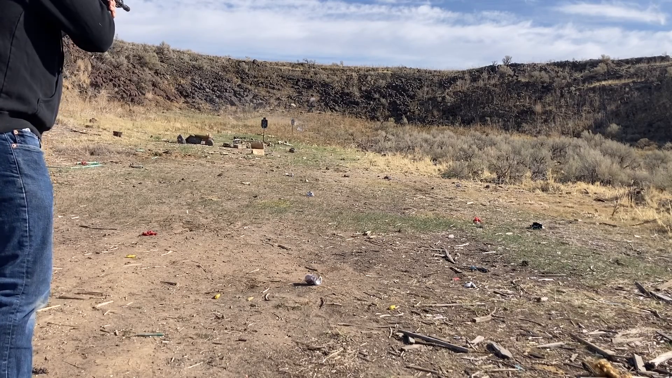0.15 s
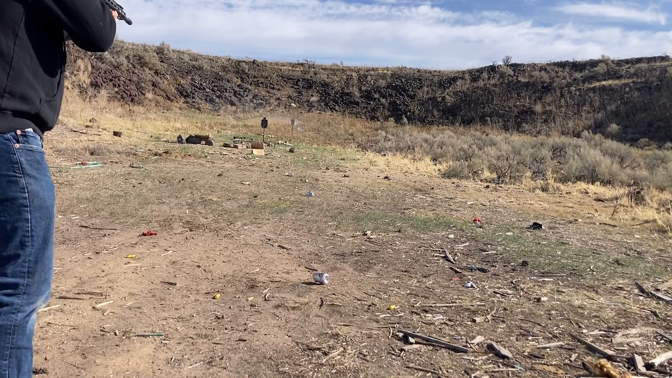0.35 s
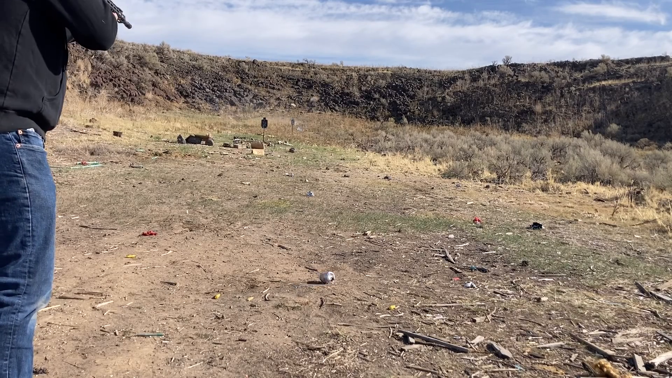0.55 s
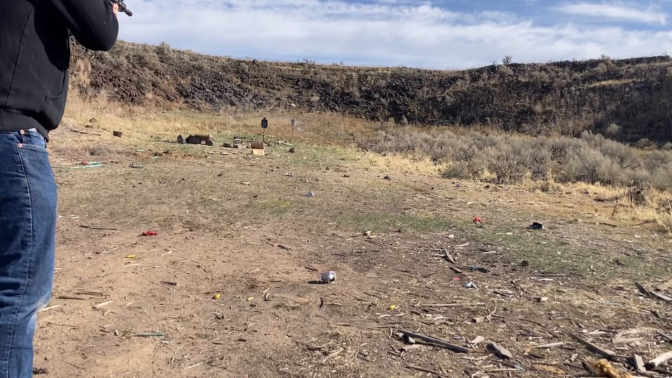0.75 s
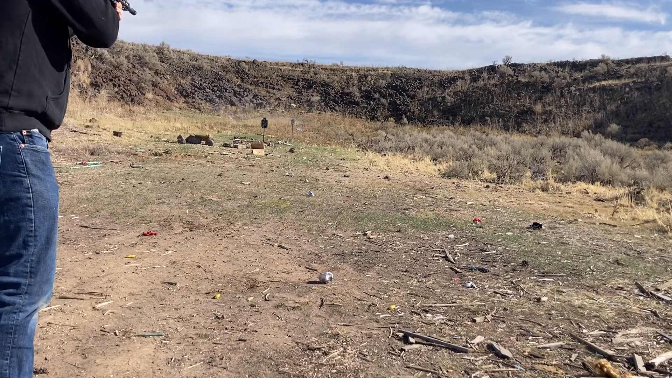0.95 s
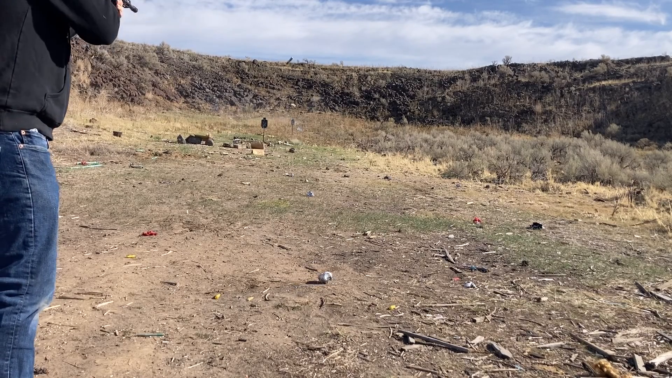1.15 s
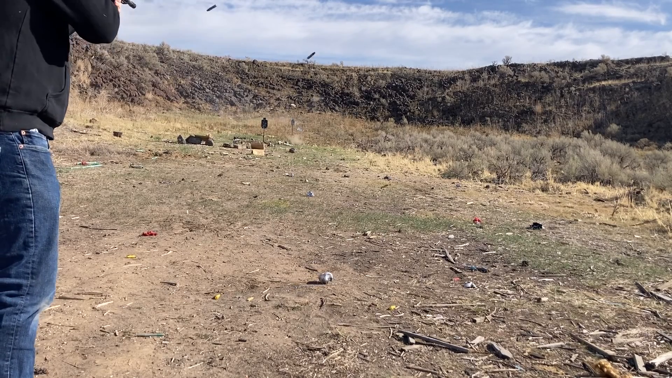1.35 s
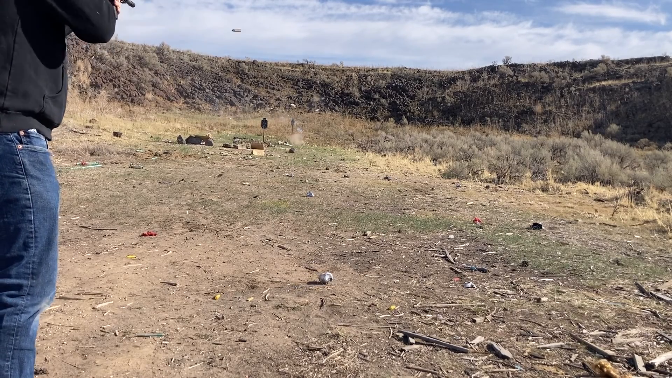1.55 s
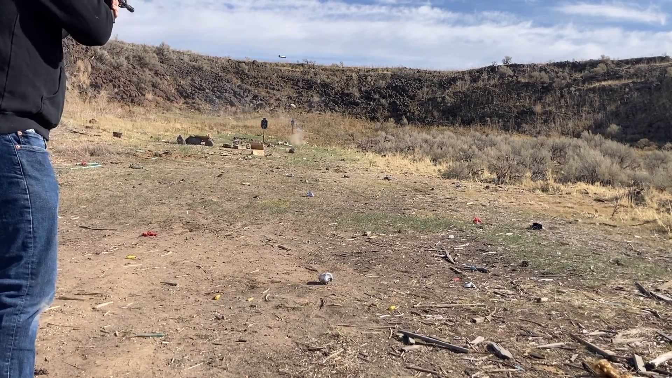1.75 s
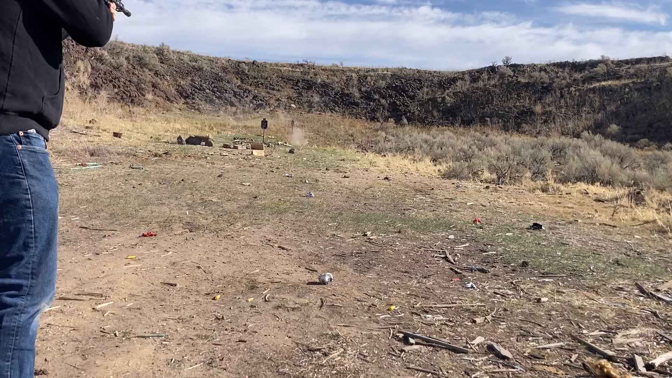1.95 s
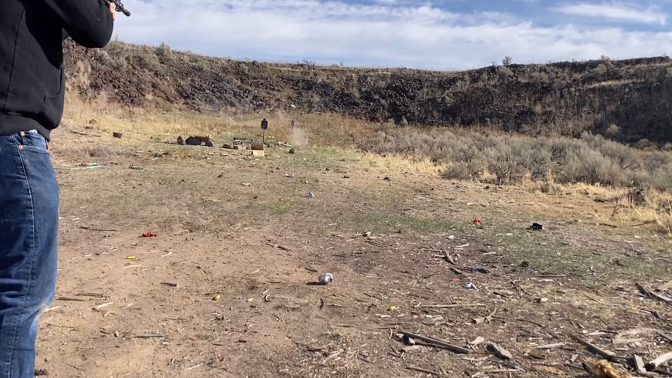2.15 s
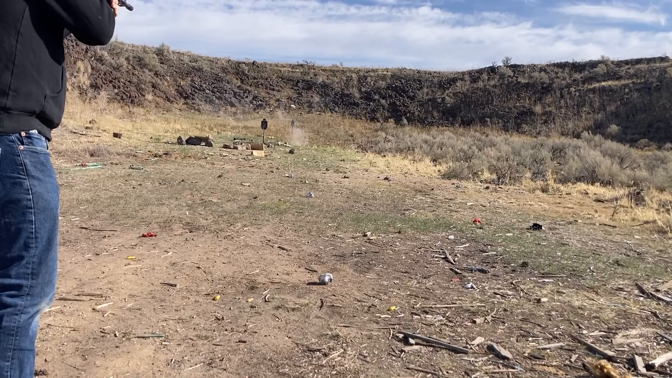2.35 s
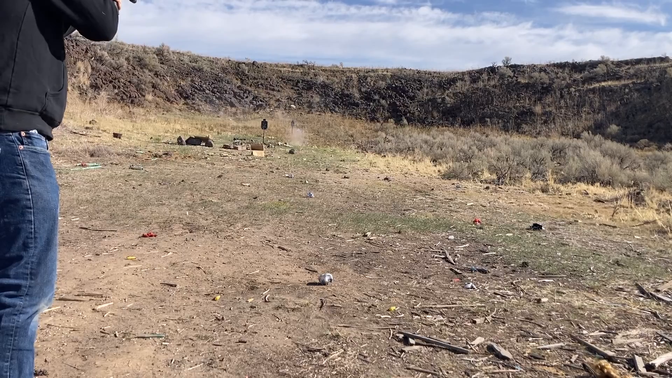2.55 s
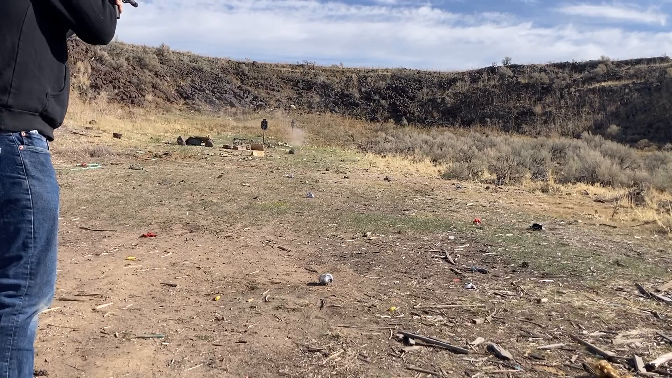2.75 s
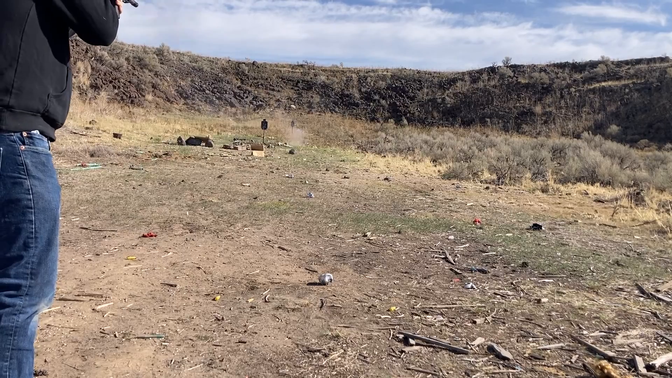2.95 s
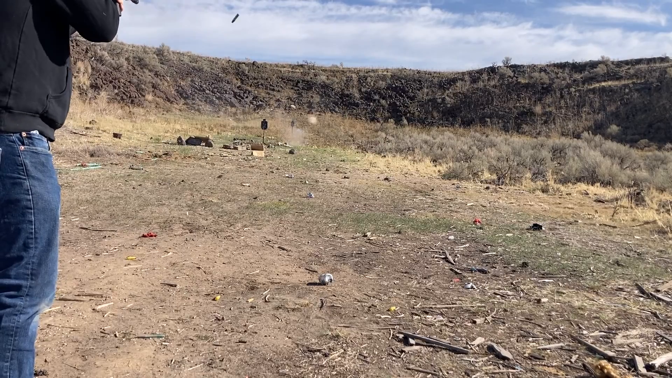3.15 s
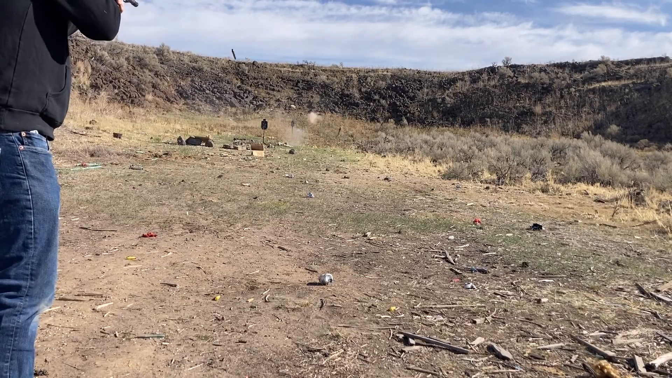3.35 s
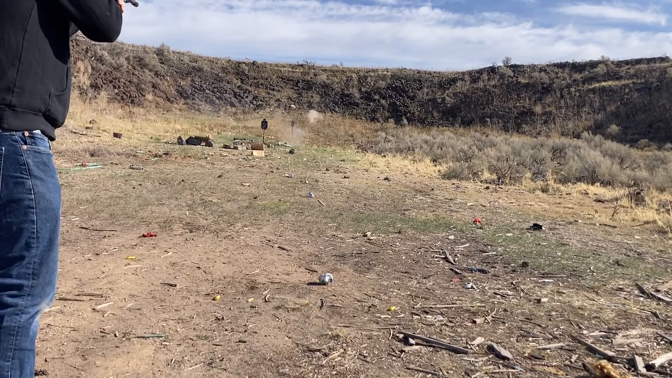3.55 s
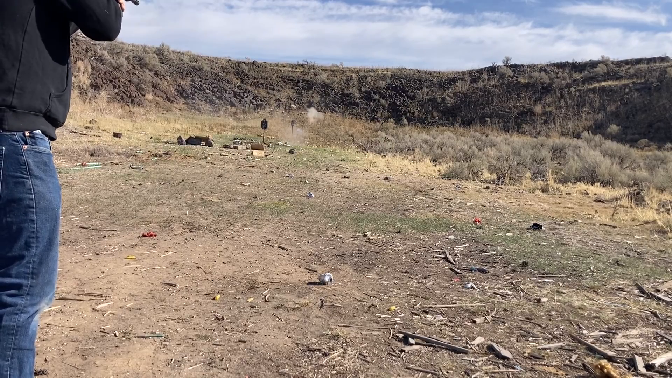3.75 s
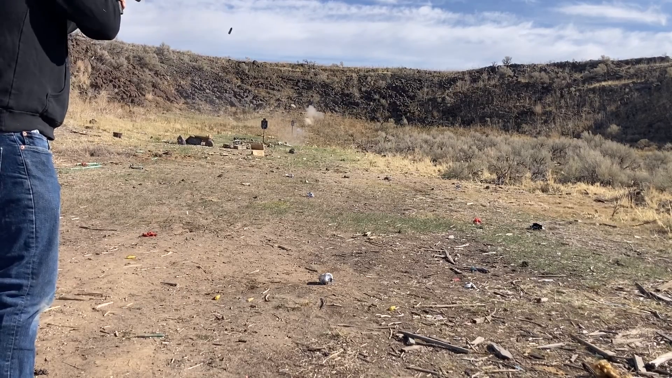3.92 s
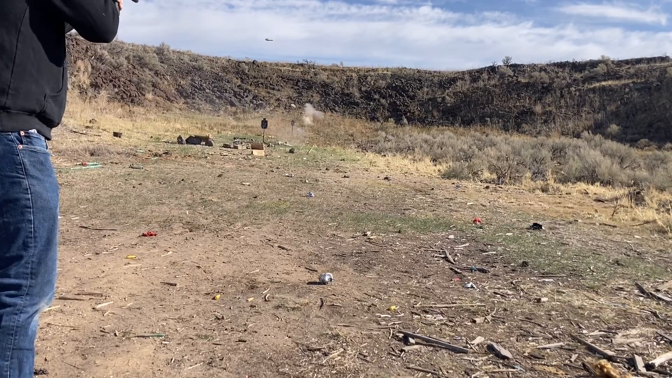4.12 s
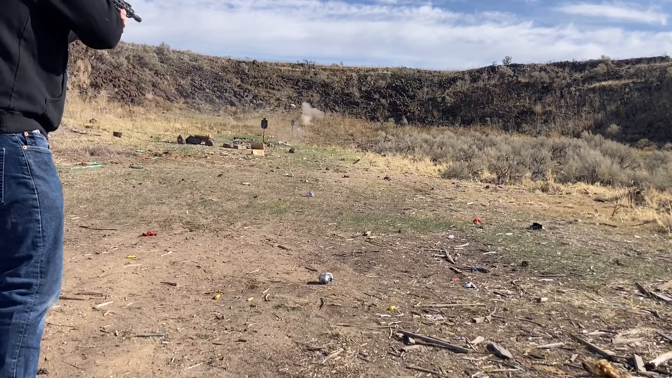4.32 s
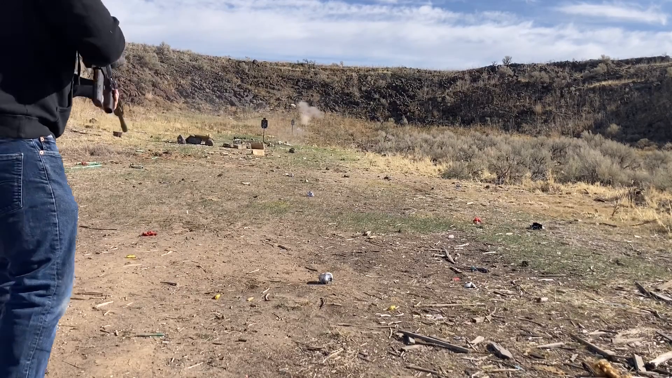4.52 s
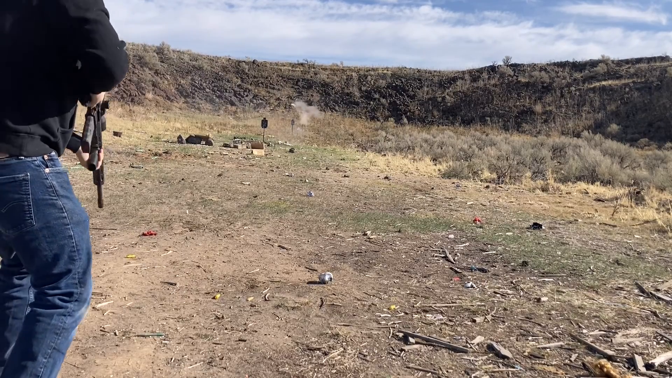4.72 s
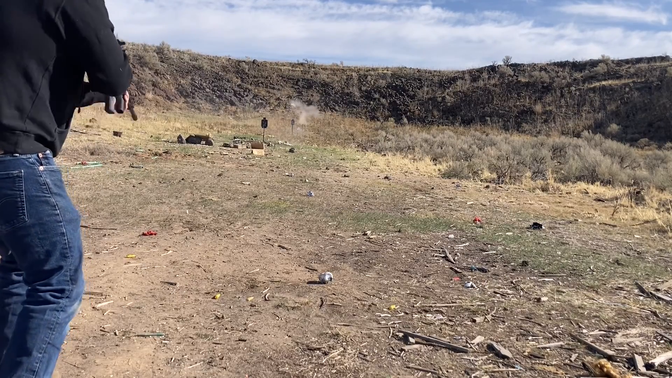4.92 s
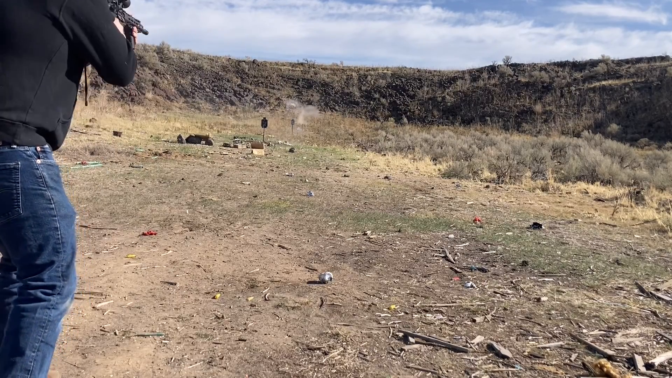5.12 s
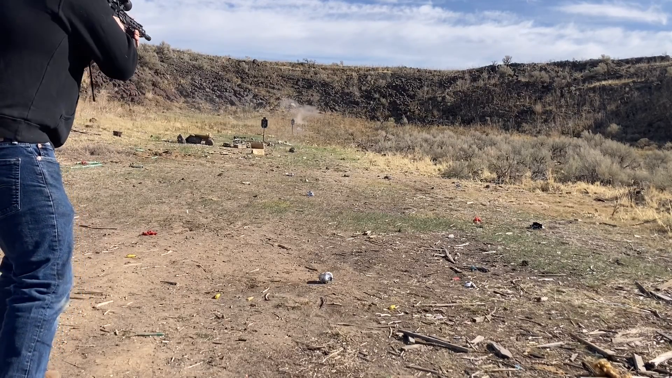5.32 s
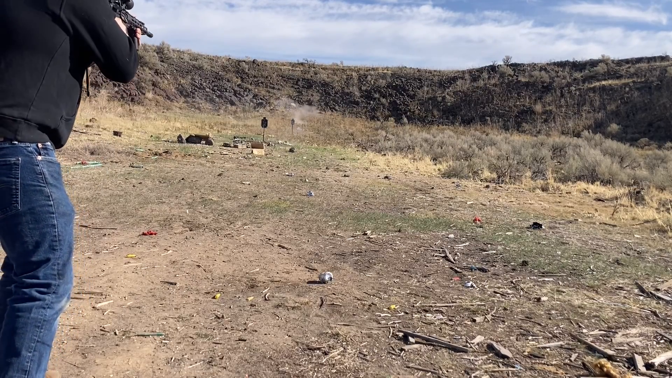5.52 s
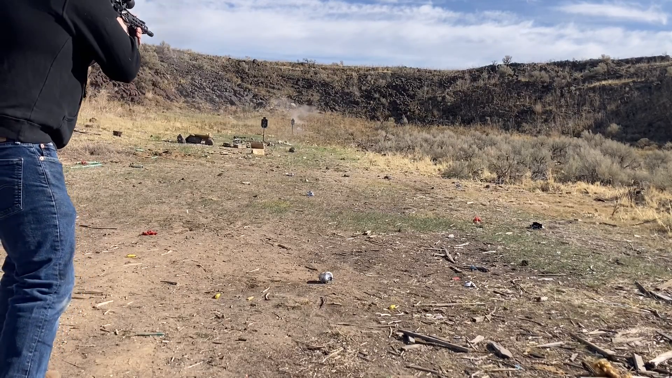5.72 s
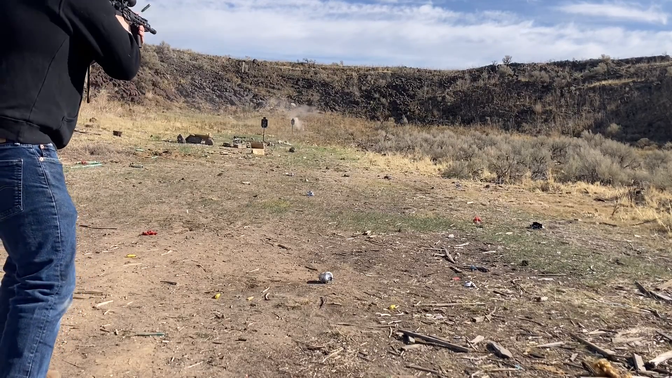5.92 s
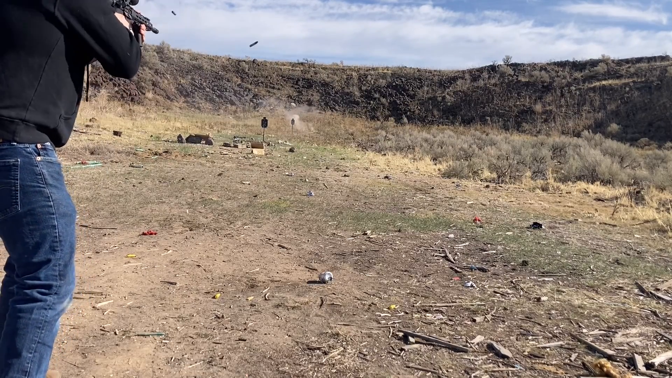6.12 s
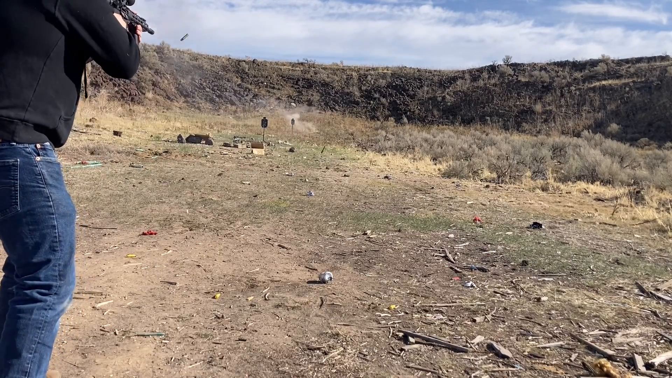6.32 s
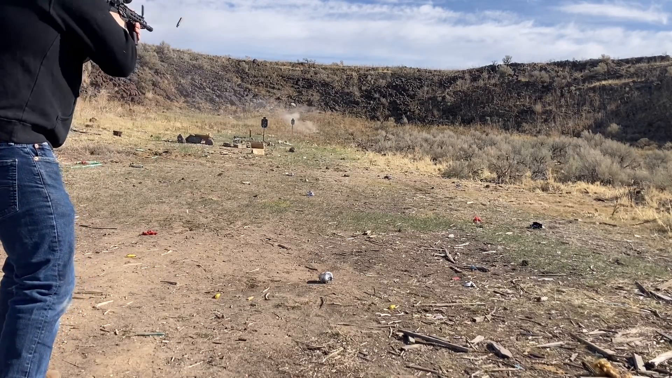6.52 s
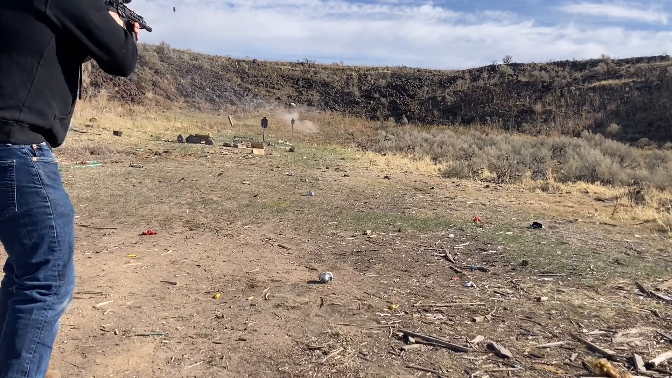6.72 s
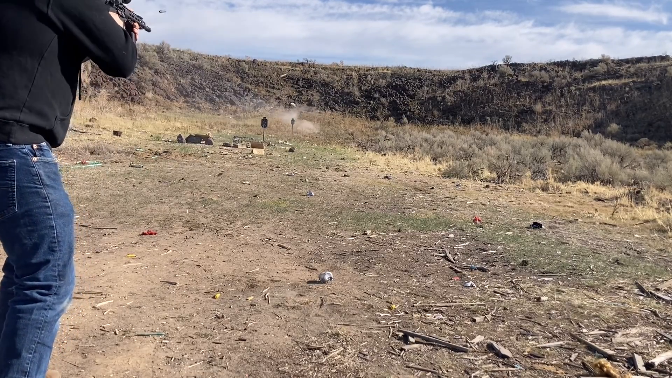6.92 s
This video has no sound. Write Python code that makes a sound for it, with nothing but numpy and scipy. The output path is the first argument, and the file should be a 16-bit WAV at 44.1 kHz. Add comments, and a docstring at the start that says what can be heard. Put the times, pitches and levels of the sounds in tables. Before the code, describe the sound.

Rapid rifle fire heard close up in an open dirt range backed by an earth bank. A tiny brass tink precedes a burst of five sharp blasts; more cases tink, two double shots follow, then brighter tinks and a quiet lull with barely any wind. Eight steady shots finish it. The nearby microphone clips on every blast, and rough, falling echoes fill the spaces and fade into distant hills.

```python
"""A breeze rumbles and bumps on a stereo microphone while an earlier shot dies away in far hills.
A brass case tinks, then a semi-automatic rifle a few steps away fires five quick shots on a dirt range.
More cases tink on stones before two pairs of shots and again after them; the breeze lulls, then eight shots end it.
Blasts are pressure fronts, shaped noise and damped modes that overload the microphone.
Their echoes are filtered noise, delayed and spread by ground, ledges, bank and hills, plus a falling scrub note."""
import sys
import numpy as np
from scipy import signal
from scipy.fft import rfft, irfft, next_fast_len
from scipy.io import wavfile
from scipy.ndimage import uniform_filter1d, map_coordinates

SR = 44100
rng = np.random.default_rng(int(sys.argv[2]) if len(sys.argv) > 2 else 0)


def waveform_to_disk(signal):
    """Save audio, clipped to [-1, 1], as 16-bit WAV at the path in sys.argv[1]."""
    frames = np.transpose(np.atleast_2d(signal))
    scaled = np.clip(frames, -1, 1) * 32767
    samples = np.round(scaled).astype(np.int16)
    wavfile.write(sys.argv[1], SR, samples)


N = 311787

# All spectra are relative, since the noise is scaled to rms 1 after filtering.
# Breeze spectrum. Each row: frequency in Hz, relative density in dB.
RUMBLE_SPECTRUM = [(20, -11), (35, 3), (60, 9.5), (120, 0.5), (200, -15), (350, -32.5), (800, -32),
                   (3000, -46), (16000, -59)]
# Soft low bumps in the breeze. Each row: start in seconds, level in dB.
BUMPS = [(0.492, -47), (0.729, -50), (2.609, -48), (2.75, -53), (2.815, -56), (4.975, -59)]
# Bump spectrum. Each row: frequency in Hz, relative density in dB.
BUMP_SPECTRUM = [(25, 22), (60, 10), (150, -2.5), (280, -17), (500, -47), (1200, -41), (8000, -63.5)]
BREEZE_DB = -61.5
LULL_DB, LULL_S, LULL_WIDTH_S = -13, 5.3, .5  # one lull in the breeze

# Brass cases landing. Each row: start in seconds, click in dB, ring in dB, extra dB on the lowest mode.
CASES = [(0.08, -66, -77, 0), (1.99, -50, -55, 4), (2.063, -60, -68, 6), (2.139, -67, -74, 0),
         (2.35, -80, -58, 6), (4.113, -39, -71, 0), (4.535, -43, -36, -18), (4.686, -64, -88, 0)]
# Modes of a brass case. Each row: nominal frequency in Hz, relative level in dB, 60 dB decay time in seconds.
BRASS_MODES = [(10790, -15, .15), (14935, -8, .18), (15030, 0, .08), (15700, -16, .05)]
# Click spectrum. Each row: frequency in Hz, relative density in dB.
CLICK_SPECTRUM = [(300, 8), (1500, -5), (4000, -3), (8000, -8), (13000, 1.5), (16000, -4.5)]

# Far slopes and the ridge behind them.
# Each row: delay in seconds, relative level in dB, rise, hold and 60 dB decay time in seconds.
HILL_FACES = [(.25, -67, .2, .6, 1.3), (.665, -58, 0.018, 0.038, 0.25)]
# Hill echo spectrum. Each row: frequency in Hz, relative density in dB.
HILLS_SPECTRUM = [(60, -6.5), (200, 12), (500, -0.5), (1200, -3), (2300, -1), (3500, -14.5), (6000, -28),
                  (12000, -46)]
# Earth bank: near side, middle and far side.
# Each row: delay in seconds, relative level in dB, rise, hold and 60 dB decay time in seconds.
BANK_FACES = [(.11, -27.5, 0.019, 0.046, .5), (.16, -35.5, .015, 0.012, .4), (.26, -33, 0.019, .17, .38)]
# Bank echo spectrum. Each row: frequency in Hz, relative density in dB.
BANK_SPECTRUM = [(25, -15), (60, -0.5), (130, 8.5), (260, 2), (450, -3.5), (800, -1), (1400, -7.5),
                 (2400, -4.5), (4500, -8.5), (8000, -11), (12000, -13), (15500, -29.5), (16500, -50)]
# Single rocks and ledges. Each row: delay after the shot in seconds, relative level in dB.
LEDGES = [(0.05, -28), (.135, -27.5), (0.169, -29.5), (.184, -25.5), (0.205, -35.5), (.33, -28),
          (0.377, -48), (.43, -38.5)]
# Ledge echo spectrum. Each row: frequency in Hz, relative density in dB.
SLAP_SPECTRUM = [(100, -19.5), (300, 11.5), (900, 14), (2500, -8), (5000, -14.5), (12000, -22.5),
                 (16000, -36.5)]
# The scrub's note sags, then drops, and swells while it drops.
SWOOP_FROM_HZ, SWOOP_SAG_HZ_PER_S, SWOOP_TO_HZ = 530, 920, 123.3
SWOOP_FALL_S, SWOOP_FALL_WIDTH_S = .155, 0.017
SWOOP_DB, SWOOP_RISE_S, SWOOP_HOLD_S, SWOOP_T60_S = -44, .025, 0.15, 0.2
SWELL_DB, SWELL_S, SWELL_WIDTH_S = 15, .15, 0.03
# Near-ground scatter spectrum. Each row: frequency in Hz, relative density in dB.
GROUND_SPECTRUM = [(30, -6.5), (100, -0.5), (220, 0.5), (470, 3.5), (850, 1), (1500, -4), (3000, -8),
                   (5000, -8.5), (8000, -9), (11500, -10.5), (15500, -17.5), (16500, -51)]
GROUND_DB, GROUND_RISE_S, GROUND_NEAR_S, GROUND_T60_S = -13.5, 0.0031, 0.014, 0.74

# Rifle shots. Each row: start in seconds, blast in dB, thump in dB, echo in dB.
SHOTS = [(0.8777, -4.5, -11.5, -1.5), (1.042, -2.5, -14, -1.5), (1.185, -3.5, -9, -5),
         (1.337, -4, -5, -3.5), (1.4778, -2.5, -11, -3), (2.95, -4.5, -8.5, -2.5), (3.1187, -5, -6.5, -4.5),
         (3.699, -4, -5.5, -2.5), (3.8533, -3, -18, -3.5), (5.717, -5, -4, -1), (5.874, -3, -41, -3.5),
         (6.022, -4, -4.5, -3.5), (6.1751, -4, -9, -2.5), (6.322, -4.5, -12, -3), (6.473, -4, -8, -3.5),
         (6.6296, -4, -15.5, -3.5), (6.7831, -4, -3.5, -5)]
EARLIER_SHOT_S = -0.595  # only its echo from the hills is still in the air
# Shock fronts, direct and off the ground. Each row: nominal delay after the shot in seconds, relative level in dB.
SHOCKS = [(.0027, -3.5), (.005, -3.5), (.0072, -5.5)]
# Muzzle gas spectrum. Each row: frequency in Hz, relative density in dB.
GAS_SPECTRUM = [(60, -18), (250, -0.5), (800, 13), (1500, 6), (2200, 5.5), (3200, -2.5), (5000, -1),
                (7000, 3.5), (11500, 3.5), (15500, -4), (16500, -24.5)]
# Modes of the hollow bark.
# Each row: nominal frequency in Hz, relative level in dB, 60 dB decay time in seconds.
BARK_MODES = [(218, 3, 0.052), (439, 4.5, 0.04), (722, 2, 0.039), (862, 1, .036), (1166, 1, .04),
              (1860, -5, 0.053), (2431, -11.5, 0.015), (2780, -8.5, 0.09), (4240, -17, 0.057)]
GAS_DB, GAS_RISE_S, GAS_HOLD_S, GAS_T60_S = -8, 0.0024, .007, .042
SHOCK_DB, BARK_DB = -16, -13.5
# the low push just behind the shock fronts; its pitch varies around PUNCH_HZ
PUNCH_DB, PUNCH_HZ, PUNCH_S, PUNCH_WIDTH_S = -14.5, 259, .008, 0.0043

# Diffuse sound at the two ports. Each row: frequency in Hz, left-right correlation from -1 to 1.
PORT_LIKENESS = [(100, .93), (280, 0.89), (600, -0.078), (1300, -0.11), (2200, 0.017), (4500, 0.2),
                 (6500, 0.65), (8500, 1)]
TOP_HZ = 16700  # upper band limit of the microphone


def amp(db):
    """Level to amplitude: 20 dB is a factor of ten."""
    return 10 ** (np.asarray(db) / 20)


def unit(x):
    """Normalisation of mean power: scale to rms 1."""
    return x / np.sqrt(np.mean(x ** 2) + 1e-20)


def clock(seconds):
    """Uniform sampling: sample times from zero."""
    return np.arange(int(seconds * SR)) / SR


def along(points, hz):
    """Logarithmic pitch scale: read (Hz, value) points on a log frequency axis."""
    f, v = np.transpose(points)
    return np.interp(np.log(hz + 1), np.log(f + 1), v)


def bell(t, centre, width):
    """Gaussian pulse: a smooth hump of height 1."""
    return np.exp(-((t - centre) / width) ** 2)


def envelope(t, rise, hold, t60):
    """Exponential decay: a soft attack, no decay until hold, then 60 dB lost per t60; silent before 0."""
    t = np.maximum(t, 0)
    attack = 1 - np.exp(-(t / rise) ** 2)
    return attack * amp(-60 * np.maximum(t - hold, 0) / t60)


def wobble(t, rate):
    """Random modulation: a smooth curve through random knots, rate knots a second."""
    return map_coordinates(rng.standard_normal(2048), [t * rate], mode="wrap")


def filtered(x, response):
    """Linear filtering: multiply the spectrum of x by a response of frequency."""
    n = x.shape[-1]
    m = next_fast_len(n + 4096)  # padded against wrap-around
    return irfft(rfft(x, m) * response(np.fft.rfftfreq(m, 1 / SR)), m)[..., :n]


def add(track, s, sound):
    """Superposition: mix a sound into a stereo track at s seconds."""
    i = round(s * SR)
    part = sound[..., max(-i, 0):N - i]
    start = max(i, 0)
    track[:, start:start + part.shape[-1]] += part


def blend(repeated, fresh, likeness):
    """Powers of unrelated sounds add; likeness is the power share of the first."""
    return np.sqrt(likeness) * repeated + np.sqrt(1 - likeness) * fresh


def rush(spectrum, t):
    """Diffuse field: coloured noise of rms 1 whose correlation between two ports depends on frequency."""
    def response(hz):
        # the mid-side power ratio sets the left-right correlation
        turn = np.arccos(np.clip(along(PORT_LIKENESS, hz), -1, 1)) / 2
        return amp(along(spectrum, hz)) * [np.cos(turn), np.sin(turn)]
    mid, side = filtered(rng.standard_normal((2, len(t))), response)
    return unit(np.array([mid + side, mid - side]))


def ring(modes, t, detune, scatter_db):
    """Modal vibration: a sum of damped sines, a little different at each blow."""
    total = np.zeros(len(t))
    for hz, db, t60 in modes:
        level_chance, pitch_chance = rng.standard_normal(2)
        level = amp(db + scatter_db * level_chance - 60 * t / t60)
        total += level * np.sin(2 * np.pi * hz * (1 + detune * pitch_chance) * t)
    return total


def breeze():
    """Turbulent pressure: light air rumbles on the microphone, with a soft bump now and then."""
    time = np.arange(N) / SR
    level_db = BREEZE_DB + LULL_DB * bell(time, LULL_S, LULL_WIDTH_S)
    out = rush(RUMBLE_SPECTRUM, time) * amp(level_db + 2.4 * wobble(time, rate=12))
    t = clock(.25)
    for s, db in BUMPS:
        bump = rush(BUMP_SPECTRUM, t) * envelope(t, rise=.012, hold=.012, t60=.1)
        add(out, s, amp(db) * bump)
    return out


def cases():
    """Impact excitation: a brass case clicks on a stone and rings in very high modes."""
    out, t = np.zeros((2, N)), clock(.3)
    for s, click_db, ring_db, lowest_db in CASES:
        click = rush(CLICK_SPECTRUM, t) * amp(-60 * t / .015)
        # where the case is struck decides how strongly its lowest mode sounds
        modes = [(hz, db + lowest_db * (k == 0), t60) for k, (hz, db, t60) in enumerate(BRASS_MODES)]
        # tumbling makes the ring flutter
        flutter = amp(3.5 * wobble(t, rate=160))
        tink = ring(modes, t, detune=.002, scatter_db=1.5) * flutter
        soft_start = 1 - np.exp(-t / .0008)
        add(out, s, amp(click_db) * click + amp(ring_db) * soft_start * tink)
    return out


def answer(faces, t):
    """Incoherent reflection: the level of an echo from several rough faces, whose powers add."""
    power = sum((amp(db) * envelope(t - delay, rise, hold, t60)) ** 2
                for delay, db, rise, hold, t60 in faces)
    return np.sqrt(power)


def hills(t):
    """Distant diffuse reflection: the far hills send back a faint, dull wash."""
    return rush(HILLS_SPECTRUM, t) * answer(HILL_FACES, t) * amp(1.0 * wobble(t, rate=63))


def through_air(x, loss_db):
    """Air absorption: a later echo has lost more treble (loss_db per second at 10 kHz)."""
    hz, t, z = signal.stft(x, SR, nperseg=256)
    loss = loss_db * (hz[:, None] / 10 ** 4) ** 0.69 * t
    return signal.istft(z * amp(-loss), SR, nperseg=256)[1][:, :x.shape[-1]]


def patchy(x, patch_db):
    """Selective scattering: rough terrain favours some pitches at some moments, as random gain patches."""
    z = signal.stft(x, SR, nperseg=256)[2]
    field = rng.standard_normal(z.shape[1:])
    field = uniform_filter1d(field, size=4, axis=0)  # across frequency
    field = uniform_filter1d(field, size=6, axis=1)  # across time
    patched = z * amp(patch_db * unit(field))
    return unit(signal.istft(patched, SR, nperseg=256)[1][:, :x.shape[-1]])


def bank(t):
    """Diffuse reflection: the rough face of the earth bank gives a long, lumpy answer."""
    lumps = amp(1.9 * wobble(t, rate=50) + 1.8 * wobble(t, rate=350))
    wash = patchy(rush(BANK_SPECTRUM, t), patch_db=2.5)
    return through_air(wash * answer(BANK_FACES, t) * lumps, loss_db=53.5)


def slaps(t):
    """Discrete reflection: each ledge returns a short, mid-heavy slap of noise."""
    level = np.zeros(len(t))
    for s, db in LEDGES:
        since = np.maximum(t - s, 0)
        level += (1 - np.exp(-since / .001)) * amp(db - 60 * since / .05)
    return rush(SLAP_SPECTRUM, t) * level


def swoop(t):
    """Successive reflection: scrub at growing distances returns a breathy note that falls in pitch."""
    fallen = (1 + np.tanh((t - SWOOP_FALL_S) / (2 * SWOOP_FALL_WIDTH_S))) / 2
    hz = (SWOOP_FROM_HZ - SWOOP_SAG_HZ_PER_S * t) * (1 - fallen) + SWOOP_TO_HZ * fallen
    phase = 2 * np.pi * np.cumsum(hz) / SR
    level = amp(SWOOP_DB + SWELL_DB * bell(t, SWELL_S, SWELL_WIDTH_S))
    level = level * envelope(t, SWOOP_RISE_S, SWOOP_HOLD_S, SWOOP_T60_S)
    # random modulation of both quadratures makes the note breathy
    in_phase, quadrature = 1 + wobble(t, rate=140), wobble(t, rate=140)
    return level * (in_phase * np.cos(phase) + quadrature * np.sin(phase))


def ground(t):
    """Scattering with spreading: the dirt returns the blast, weaker as the wave spreads."""
    spreading = 1 / (1 + t / GROUND_NEAR_S)
    stones = amp(1.3 * wobble(t, rate=300))
    level = amp(GROUND_DB) * envelope(t, GROUND_RISE_S, 0, GROUND_T60_S) * spreading * stones
    return rush(GROUND_SPECTRUM, t) * level


def echoes():
    """Superposed reflections: near ground, scrub, ledges, earth bank and far hills answer one shot."""
    t = clock(1.5)
    return ground(t) + swoop(t) + slaps(t) + bank(t) + hills(t)


def thump(start_hz=135, end_hz=50, settle=0.013, rise=0.014, t60=0.11, port_scatter=0.088):
    """Forced motion: pressure swings the microphone through slowing bass cycles, the ports out of step."""
    t = clock(.15)
    cycles = end_hz * t + (start_hz - end_hz) * settle * (1 - np.exp(-t / settle))
    cycles = cycles * (1 + 0.048 * rng.standard_normal())  # pitch varies from shot to shot
    cycles = cycles + port_scatter * rng.standard_normal((2, 1))
    return envelope(t, rise, 0, t60) * np.sin(2 * np.pi * cycles)


def shock(t, length):
    """Blast wave: a sudden overpressure followed by a longer, weaker suction."""
    u = np.maximum(t, 0) / length
    return (t > 0) * (1 - u) * np.exp(-u)


def blast(t, signature):
    """Muzzle blast: shock fronts, a ragged burst of gas, a short hollow bark and a low push."""
    gas = blend(signature, rush(GAS_SPECTRUM, t), likeness=.5)
    ragged = amp(2 * wobble(t, rate=900))
    gas = gas * ragged * envelope(t, GAS_RISE_S, GAS_HOLD_S, GAS_T60_S)

    fronts = np.zeros(len(t))
    for s, db in SHOCKS:
        arrival = s * (1 + .04 * rng.standard_normal())
        fronts += amp(db) * shock(t - arrival, length=.00055)

    since = np.maximum(t - .002, 0)
    swell = 1 - np.exp(-since / 0.0005)
    # each port hears the bark a little differently
    ports = [ring(BARK_MODES, since, detune=.011, scatter_db=2.2) for port in range(2)]
    bark = swell * np.array(ports)

    punch_hz = PUNCH_HZ * np.exp(0.22 * rng.standard_normal())
    punch = bell(t, PUNCH_S, PUNCH_WIDTH_S) * np.sin(2 * np.pi * punch_hz * (PUNCH_S - t))
    return amp(GAS_DB) * gas + amp(SHOCK_DB) * fronts + amp(BARK_DB) * bark + amp(PUNCH_DB) * punch


def rifle():
    """Direct and reflected sound: every shot sums its blast, its thump and its echoes."""
    out, t = np.zeros((2, N)), clock(.1)
    # same rifle, same place: part of the blast and of the echo repeats from shot to shot
    signature, terrain = rush(GAS_SPECTRUM, t), echoes()
    add(out, EARLIER_SHOT_S, hills(clock(1.5)))
    for s, blast_db, thump_db, echo_db in SHOTS:
        add(out, s, amp(blast_db) * blast(t, signature))
        add(out, s, amp(thump_db) * thump())
        add(out, s, amp(echo_db) * blend(terrain, echoes(), likeness=.6))
    return out


def scene():
    """Superposition of breeze, brass and rifle."""
    return breeze() + cases() + rifle()


def record(dry):
    """Microphone response: treble later on the left, deepest bass cut, loud peaks rounded, top band-limited."""
    lag_s, in_step_hz = .000229, 7070

    def skew(hz):
        """Group delay as a phase slope: half the lag for each port, fading in around 5 kHz."""
        return np.pi * lag_s * (hz - in_step_hz) / (1 + np.exp((5000 - hz) / 400))

    ports = filtered(dry, lambda hz: np.exp(1j * skew(hz) * [[-1], [1]]))
    ports = signal.sosfilt(signal.butter(1, 22, "highpass", fs=SR, output="sos"), ports)
    rounded = ports / (1 + np.abs(ports / .85) ** 4) ** (1 / 4)  # overload: peaks stay below .85
    return filtered(rounded, lambda hz: 1 / (1 + (hz / TOP_HZ) ** 160))


dry = scene()
out = record(dry)
waveform_to_disk(out)
```